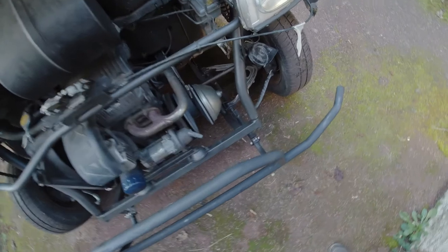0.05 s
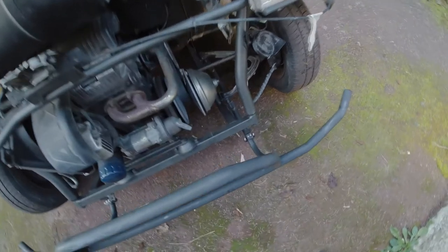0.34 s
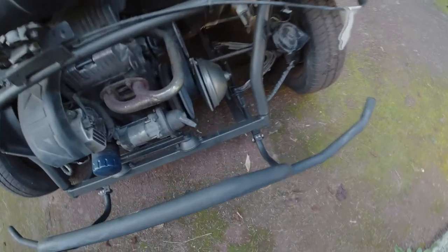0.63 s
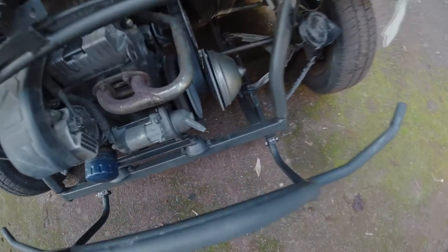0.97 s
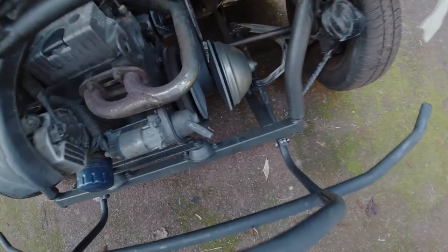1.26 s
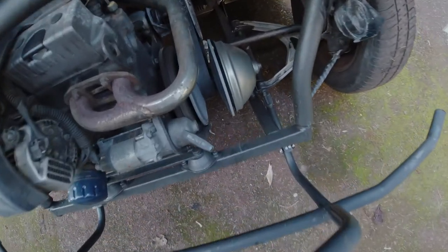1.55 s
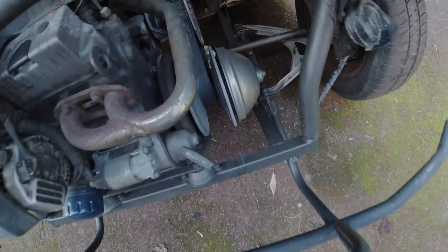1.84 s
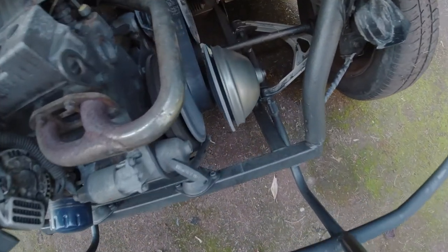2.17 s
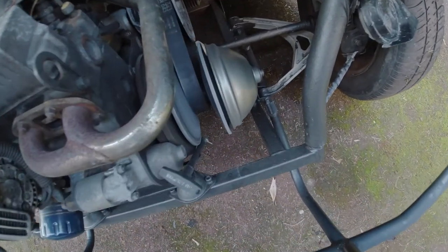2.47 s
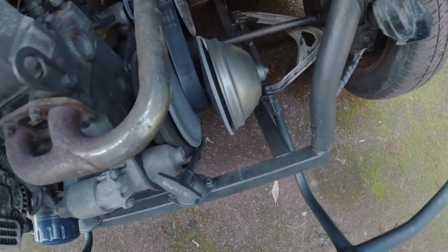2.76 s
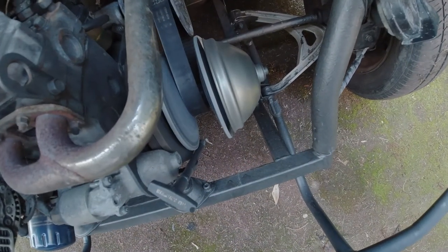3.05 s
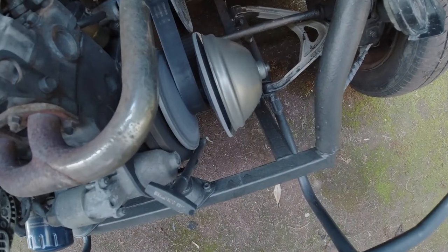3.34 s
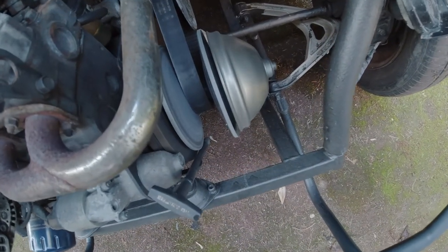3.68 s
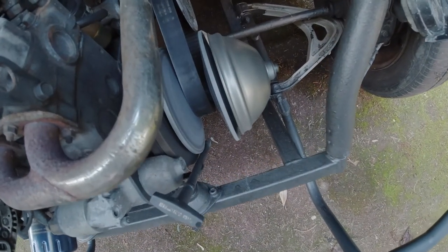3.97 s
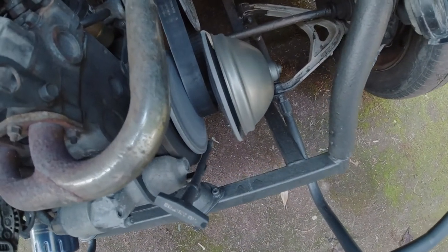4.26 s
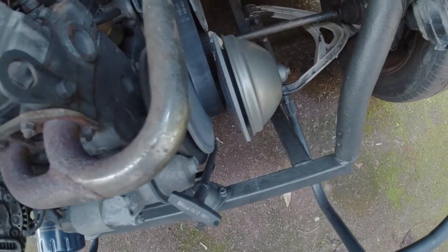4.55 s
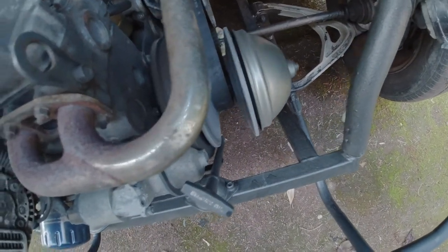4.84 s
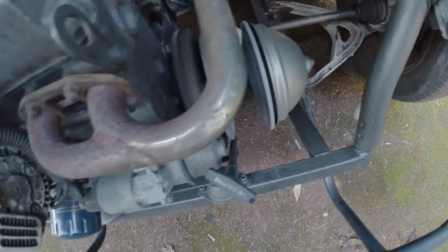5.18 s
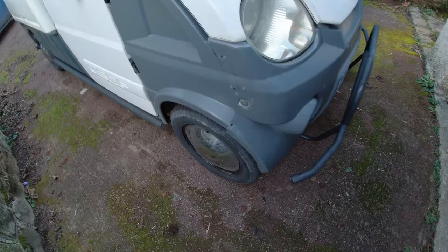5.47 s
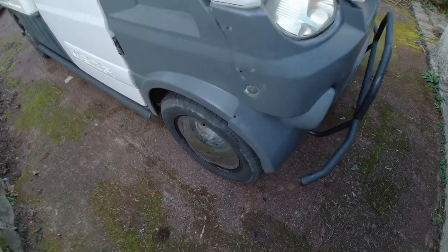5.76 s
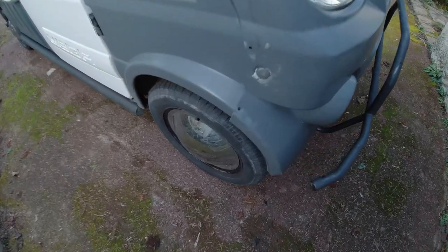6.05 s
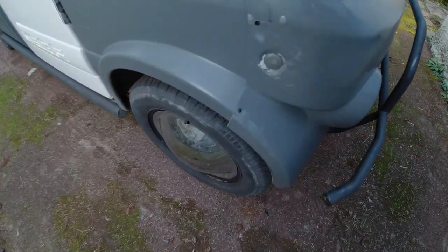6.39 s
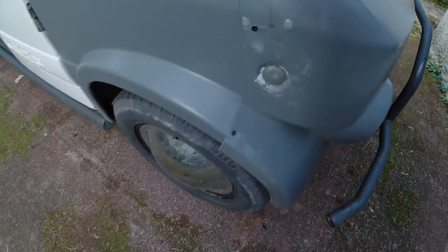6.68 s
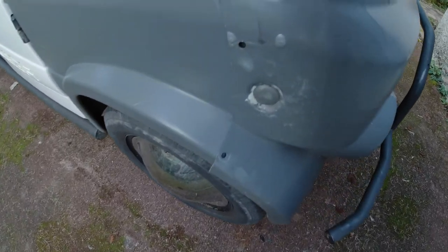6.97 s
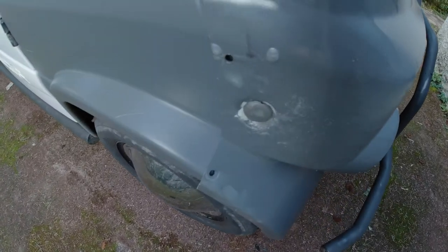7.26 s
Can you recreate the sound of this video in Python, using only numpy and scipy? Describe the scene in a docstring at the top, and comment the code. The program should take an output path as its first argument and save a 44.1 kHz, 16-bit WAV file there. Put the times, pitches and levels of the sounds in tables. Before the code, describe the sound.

Rapid knocking and ticking of a small idling diesel draws nearer and ends suddenly, followed by brief clicks over a faint hum.

```python
"""First you hear a small two-cylinder diesel idling outdoors, ever closer above its open engine bay.
Each cycle brings two combustion knocks half a turn apart, with gulps of gas and ticking valves.
Now and then a firing knocks harder and makes the crankcase, the engine's lower housing, clank.
The sound of the idling engine is cut off abruptly; a few sharp clicks and soft rustles follow,
over a faint distant hum."""
import sys
import numpy as np
from scipy import signal
from scipy.fft import rfft, irfft, next_fast_len
from scipy.io import wavfile
from scipy.ndimage import uniform_filter1d

SR = 44100
rng = np.random.default_rng(int(sys.argv[2]) if len(sys.argv) > 2 else 0)


def to_wav(sig):
    """Store sig (one row per channel, or 1-D mono) as 16-bit WAV at the path in sys.argv[1].

    Samples outside -1..1 are clipped; the rate is SR.
    """
    pcm = np.clip(np.atleast_2d(sig), -1, 1) * 32767
    pcm = np.round(pcm).astype(np.int16)
    wavfile.write(sys.argv[1], SR, pcm.T)  # frames by channels


N = 322812
TIME = np.arange(N) / SR

# Tone colours of the sounds. Each row: pitch in Hz, relative strength at that pitch in dB.
AIR_COLOUR = [(25, -2), (45, -11.5), (85, -4), (110, -5), (200, -5.5), (270, -10.5), (370, -22.5),
              (1100, -30), (2200, -37), (3400, -44), (6500, -51.5), (16000, -85)]
CLICK_COLOUR = [(150, -34), (400, -3.5), (1000, -9), (2200, 3.5), (3300, -3), (4200, -15), (6500, -21.5),
                (9000, -34), (11000, -53), (16000, -84)]
WHIRR_COLOUR = [(25, -18), (100, -0.5), (400, 8.5), (750, -0.5), (1300, -10.5), (2300, -13), (3200, -13.5),
                (4500, -23.5), (6000, -28.5), (7600, -45), (9600, -28.5), (13000, -34.5), (16000, -47)]
VALVE_COLOUR = [(200, -3), (600, 6), (1300, 1.5), (2200, -9.5), (3200, -11.5), (4500, -21), (6200, -20),
                (7600, -25.5), (9600, -16), (13000, -29.5), (16000, -27.5)]
INJECTION_COLOUR = [(400, 5.5), (2500, 1), (3700, 0.5), (4400, -1.5), (5700, -8.5), (7500, -11),
                    (9800, -6.5), (13000, -9.5), (16000, -29.5)]
FIRST_KNOCK_COLOUR = [(150, -5.5), (500, -17.5), (800, -4.5), (1300, -3), (2100, -2.5), (3100, -2.5),
                      (3700, -10), (4500, -10), (5300, -22.5), (7500, -35), (11000, -29.5), (16000, -46.5)]
SECOND_KNOCK_COLOUR = [(150, 2), (500, -30), (900, 6.5), (1600, -11.5), (2200, -10), (2900, -4),
                       (3700, -16), (6000, -34), (16000, -51.5)]
# Soft rustles. Each row: start in seconds, seconds to peak, relative level in dB.
RUSTLE_SWELLS = [(5.171, 0.047, -59.5), (5.558, .07, -47.5), (5.729, 0.011, -47), (6.805, 0.01, -66)]
# Sharp clicks after the engine sound ends. Each row: start in seconds, relative level in dB.
CLICK_HITS = [(5.5737, -22), (5.5818, -5), (5.5967, -4), (5.6032, -19), (5.6065, -13), (5.6088, -13),
              (5.6775, -30), (5.702, -35), (5.7368, -9), (5.7953, -38)]
# Drawing nearer. Each row: time in seconds, then relative dB of gas, panels, valves and knocks.
APPROACH = [(0, -8, -22, -1, -30), (0.599, -4, -5.5, 1, -28), (1.299, -2, -0.5, 3, -23.5),
            (2.502, -1.5, 0.5, 4, -20), (4, -2.5, 1, 4.5, -20.5), (5.2, -1, 2, 4.5, -23.5)]
# Suction pulses. Each row: seconds after the first knock, seconds to peak, relative level in dB.
GAS_GULPS = [(.001, 0.003, -27), (0.029, 0.0034, -16.5), (0.0406, 0.0038, -17.5), (.0620, .0014, -13.5),
             (0.0901, 0.0011, -21)]
# Ringing air in the pipes, and ringing panels.
# Each row: seconds after the first knock, pitch in Hz, seconds to peak, relative level in dB.
PIPE_TONES = [(.002, 116, 0.01, -32), (.031, 128, 0.016, -29), (.0615, 72.3, .006, -25),
              (.0622, 177.7, 0.006, -20.5), (.0628, 227, 0.0039, -16), (.0895, 84, 0.0064, -17),
              (.0905, 157.4, 0.0043, -22.5)]
PANEL_TONES = [(.016, 330, .007, -33.5), (.035, 353, 0.0074, -20.5), (.0630, 333.6, 0.0066, -18.5),
               (.0626, 283, 0.005, -16), (.0632, 602, .005, -23), (.090, 318, .006, -27.5)]
# Ringing cover and crankcase. Each row: pitch in Hz, seconds to peak, relative level in dB.
COVER_TONES = [(663.3, 0.0062, -17), (694.2, 0.0089, -19.5)]
CRANKCASE_TONES = [(1248, .005, -21.5), (1546, 0.0045, -11), (1619, 0.014, -21), (1960, .002, -11.5),
                   (2566, 0.0061, -15.5), (2860, 0.0027, -19.5)]
# How openly the cover faces the listener. Each row: time in seconds, gain in dB.
COVER_FACING = [(0, -7.5), (.5, 0), (1.5, -5.5), (2.2, -1), (2.8, 1.5), (5.2, 3.5)]
# Pitches the engine block lifts or swallows. Each row: pitch in Hz, width in Hz, gain in dB.
BLOCK_BANDS = [(490, 79, -8.5), (702, 30, 4.5), (897, 34, 6.5), (1243, 28, 2.5), (1528, 31, 4),
               (1622, 7.3, 13), (2140, 150, 4.5), (2273, 91, -3.5), (2582, 120, 8.5), (3312, 58, 9),
               (3672, 310, -5.5), (3840, 56, 6), (4020, 45, 7), (5614, 130, 7.5), (6100, 170, 7)]
# Valve and pump contacts. Each row: seconds after the first knock, length in seconds, relative dB.
VALVE_TICKS = [(0.0217, 0.033, -25.5), (0.0303, .008, -21.5), (0.048, 0.018, -25), (0.06, .010, -24),
               (0.07, .008, -31), (0.088, 0.0069, -28.5)]
# Firings that knock harder. Each row: time in seconds, dB above the usual level.
HARD_FIRINGS = [(.013, 4.5), (.489, 3), (.758, 6.5), (1.084, 8), (1.203, 4), (1.322, 6.5), (1.592, 3),
                (2.036, 2), (2.274, 3.5), (2.631, 3.5), (2.899, 5.5), (3.970, 5), (4.416, 3), (4.654, 4)]

HUM_HZ, HUM_DB = 71.3, -55
FIRST_CYCLE_S, CUT_S = 0.0132, 5.187  # the idle is heard between these times
CYCLE_S, JITTER_S = 0.118977, 0.0002  # the governor holds the idle this steady
SECOND_KNOCK_S = 0.0313  # the second cylinder fires half a turn after the first
SECOND_KNOCK_DB, SECOND_FOLLOWS = -18, 0.88  # relative level up close; share of the first knock's rise
UNEVEN_DB = 1.14  # no two firings burn alike
SHAKE_DB = -31.5  # shaking on the mounts, relative to the gas level
SNAP_FADE = 0.21  # extra dB the injection snap loses with distance, per dB the valves lose
CLANK_FULL_DB, CLANK_GROWTH = -13, 1.49  # knock level for a full clank; dB of clank per dB of knock
CLANK_SCATTER_DB, FIRST_CLANK_DB = 0.5, -11  # the first cylinder shakes the crankcase less
PORT_HZ, PORT_BLUR = 2300, 0.64  # pitch where left and right draw apart; share of scattered sound
CUTOFF_HZ = 16000


def from_db(db):
    """Turn decibels into a factor to multiply a sound by."""
    return 10 ** (np.asarray(db) / 20)


def rms_one(x):
    """Scale a signal to an average power of one."""
    return x / np.sqrt(np.mean(x ** 2) + 1e-20)


def colour(x, spectrum):
    """Give a sound a tone colour; white noise keeps its overall power."""
    size = 8192
    hz, level_db = np.transpose(spectrum)
    grid_hz = np.arange(size // 2 + 1) * SR / size
    gain = rms_one(from_db(np.interp(np.log(grid_hz + 1), np.log(hz), level_db)))
    # A minimum-phase filter: nothing rings before the blow that causes it.
    cepstrum = irfft(np.log(gain))
    cepstrum[1:size // 2] *= 2
    cepstrum[size // 2 + 1:] = 0
    response = irfft(np.exp(rfft(cepstrum)))
    return signal.fftconvolve(x, response[None], axes=-1)[:, :N]


def place(times, sounds):
    """Lay one short sound at each of the times."""
    out = np.zeros(2 * N)
    for start_s, sound in zip(times, sounds):
        at = max(round(start_s * SR), 0)
        out[at:at + len(sound)] += sound
    return out[:N]


def swell(peak_s):
    """A curve that rises to 1 at peak_s, then dies away."""
    age = TIME[:SR // 8] / peak_s
    return age * np.exp(1 - age)


def stereo(direct, scattered, toward):
    """Two close listening ports differ more at high pitch; with toward above 0 the left one leads."""
    size = next_fast_len(N)
    hz = np.arange(size // 2 + 1) * SR / size
    apart = hz / np.hypot(hz, PORT_HZ)
    difference = 1j * toward * rfft(direct, size) + PORT_BLUR * rfft(scattered, size)
    side = irfft(apart * difference, size)[:N]
    return direct + side * np.array([[1], [-1]])


def rattle(times, level_db, length_s, tail_db, tail_t60, alike, grain_db):
    """Partly alike bursts of tiny metal impacts; the tail falls 60 dB in tail_t60 seconds."""
    age = TIME[:SR // 9]
    shape = np.exp(-(age / length_s) ** 2) + from_db(tail_db - 60 * age / tail_t60)
    shape = shape * (1 - np.exp(-age / 0.001))
    pair = []
    for _ in range(2):  # the direct part, then the scattered part
        fresh = rng.standard_normal((len(times), len(age)))
        impacts = np.sqrt(alike) * rng.standard_normal(len(age)) + np.sqrt(1 - alike) * fresh
        bunching = rms_one(uniform_filter1d(rng.standard_normal(fresh.shape), size=60))
        clumps = rms_one(from_db(grain_db * np.minimum(bunching, 2)))
        pair.append(place(times, from_db(level_db)[:, None] * shape * impacts * clumps))
    return np.array(pair)


def rings(times, level_db, hz, peak_s, scatter_db=2.0, waver=0.0089):
    """A dying tone for every blow, each a little different in strength and pitch."""
    vary_db, detune = (rng.standard_normal((len(times), 2)) * [scatter_db, waver]).T
    strength = from_db(level_db + np.minimum(vary_db, scatter_db))
    shape = swell(peak_s)
    tones = -np.sin(2 * np.pi * hz * (1 + detune[:, None]) * TIME[:len(shape)])
    return place(times, strength[:, None] * shape * tones)


def outdoors():
    """Distant rumble and a low, slightly wavering hum."""
    air = from_db(-46.5) * colour(rng.standard_normal((2, N)), AIR_COLOUR)
    waver = rms_one(np.interp(TIME, np.linspace(0, TIME[-1], num=40), rng.standard_normal(40)))
    phase = 2 * np.pi * np.cumsum(HUM_HZ + 0.34 * waver) / SR
    hum = from_db(HUM_DB + 1.2 * waver) * np.sqrt(2) * np.sin(phase)
    return stereo(air[0] + hum, 2 * air[1], toward=-0.5)


def rustle():
    """A faint wash swells and fades as the engine sound ends, round the clicks and once more later."""
    level = 0
    for start_s, peak_s, level_db in RUSTLE_SWELLS:
        age = np.maximum(TIME - start_s, 0) / peak_s
        level = level + from_db(level_db) * age * np.exp(1 - age)
    direct, scattered = colour(level * rng.standard_normal((2, N)), CLICK_COLOUR)
    return stereo(direct, scattered, toward=-0.6)


def clicks():
    """Hard snaps to the right, each with a small ping, a short buzz and a faint outdoor tail."""
    times, level_db = np.transpose(CLICK_HITS)
    snaps = place(times, from_db(level_db + 9)[:, None])
    buzz = rattle(times - 0.0005, level_db - 23, length_s=0.008,
                  tail_db=-3.5, tail_t60=0.18, alike=0, grain_db=-4.0)
    direct, scattered = colour(np.array([snaps + buzz[0], buzz[1]]), CLICK_COLOUR)
    ping = rings(times, level_db - 25, hz=3450, peak_s=0.002)
    return stereo(direct + ping, scattered, toward=-0.91)


def engine_bay(x, echo_db, t60, count):
    """Dense echoes off nearby metal ripple the treble; the ripple shifts as the listener moves."""
    age = TIME[:SR // 20]
    treble = signal.butter(2, 3200, "high", fs=SR, output="sos")
    out = x
    for spot in range(count):
        echoes = rms_one(rng.standard_normal(len(age)) * from_db(-60 * age / t60)) / np.sqrt(len(age))
        reflected = signal.oaconvolve(x, signal.sosfilt(treble, echoes)[None], axes=-1)[:, :N]
        closeness = np.sqrt(np.maximum(1 - np.abs(TIME / CUT_S * (count - 1) - spot), 0))
        out = out + from_db(echo_db) * closeness * reflected
    return out


def engine_block(x):
    """The cast metal lifts and prolongs some pitches and swallows others."""
    for hz, width_hz, lift_db in BLOCK_BANDS:
        band = signal.lfilter(*signal.iirpeak(hz, hz / width_hz, fs=SR), x)
        x = x + (from_db(lift_db) - 1) * band
    return x


def throb(starts, gas_db, panel_db):
    """Gas pulses shake pipes and panels, the first knock rings the cover, and the engine rocks."""
    suction = 0
    for delay, peak_s, level_db in GAS_GULPS:
        strength = from_db(gas_db + level_db + rng.normal(0, 1.0, len(starts)))
        suction = suction - place(starts + delay, strength[:, None] * swell(peak_s))
    body = signal.sosfilt(signal.butter(1, [14, 900], "band", fs=SR, output="sos"), suction)
    for tones, near_db in ((PIPE_TONES, gas_db), (PANEL_TONES, panel_db)):
        for delay, hz, peak_s, level_db in tones:
            body += rings(starts + delay, near_db + level_db, hz, peak_s)
    facing_db = np.interp(starts, *np.transpose(COVER_FACING))
    for hz, peak_s, level_db in COVER_TONES:
        body += rings(starts + 0.0012, level_db + facing_db, hz, peak_s, waver=0.0046)
    cycle = (TIME - FIRST_CYCLE_S) / CYCLE_S
    shake = -np.cos(3 * 2 * np.pi * cycle)  # three shakes on the mounts per cycle
    body += from_db(SHAKE_DB + np.interp(TIME, starts, gas_db)) * shake
    return stereo(body, np.zeros(N), toward=0.99)


def valves(starts, valve_db):
    """Valve and pump parts tick as they meet, at the same points in every cycle."""
    ticks = 0
    for delay, length_s, level_db in VALVE_TICKS:
        tick_db = valve_db + level_db - 5.5 + rng.normal(0, 1.82, len(starts))
        ticks = ticks + rattle(starts + delay, tick_db, length_s,
                               tail_db=-13.0, tail_t60=0.24, alike=0.26, grain_db=2.5)
    return ticks


def crankcase(times, knock_db):
    """The harder the knock, the more the crankcase clanks, with a new blend of tones each time."""
    hardness_db = CLANK_GROWTH * (knock_db - CLANK_FULL_DB)
    return sum(rings(times, hardness_db + level_db, hz, peak_s, CLANK_SCATTER_DB, waver=0.004)
               for hz, peak_s, level_db in CRANKCASE_TONES)


def knock_levels(times, usual_db):
    """Each firing strays a little from the usual level in dB; the hard ones stand out."""
    level_db = usual_db + UNEVEN_DB * rng.standard_normal(len(times))
    for hard_s, extra_db in HARD_FIRINGS:
        is_hard = np.abs(times - hard_s) < CYCLE_S / 8
        level_db = np.where(is_hard, usual_db + extra_db, level_db)
    return level_db


def clatter(starts, first_db, second_db, valve_db):
    """Knocks, the injection pump's snap, valves and whirring belt and gears sound through the block."""
    first = rattle(starts - 0.001, first_db - 1.5, length_s=0.015,
                   tail_db=-4.5, tail_t60=0.066, alike=0.24, grain_db=1.0)
    second_at = starts + SECOND_KNOCK_S + rng.normal(0, 0.00031, len(starts))
    second = rattle(second_at - 0.0005, second_db - 12, length_s=0.018,
                    tail_db=-9.5, tail_t60=0.095, alike=0.067, grain_db=2.0)
    snap_db = valve_db + SNAP_FADE * (valve_db - valve_db.max()) - 21
    snap = rattle(second_at, snap_db, length_s=0.0097,
                  tail_db=-12.0, tail_t60=0.064, alike=0.49, grain_db=3.5)
    ticks = valves(starts, valve_db)
    whirr = from_db(np.interp(TIME, starts, valve_db) - 33.0) * rng.standard_normal((2, N))
    contacts = ((first, FIRST_KNOCK_COLOUR), (second, SECOND_KNOCK_COLOUR),
                (snap, INJECTION_COLOUR), (ticks, VALVE_COLOUR), (whirr, WHIRR_COLOUR))
    metal = engine_block(sum(colour(force, spectrum) for force, spectrum in contacts))
    direct, scattered = engine_bay(metal, echo_db=-4, t60=0.040, count=5)
    clank = from_db(FIRST_CLANK_DB) * crankcase(starts, first_db) + crankcase(second_at, second_db)
    return stereo(direct + clank, scattered, toward=0.83)


def engine():
    """The steady idle grows louder as the listener nears; then its sound is cut off abruptly."""
    starts = np.arange(FIRST_CYCLE_S, CUT_S, CYCLE_S)
    starts = starts + rng.normal(0, JITTER_S, len(starts))
    times, *levels = np.transpose(APPROACH)
    gas_db, panel_db, valve_db, knock_db = [np.interp(starts, times, level) for level in levels]
    first_db = knock_levels(starts, knock_db)
    second_usual_db = SECOND_KNOCK_DB + SECOND_FOLLOWS * (knock_db - knock_db.max())
    second_db = knock_levels(starts + SECOND_KNOCK_S, second_usual_db)
    audible = np.exp(-np.maximum(TIME - CUT_S, 0) / 0.0048)
    return audible * (clatter(starts, first_db, second_db, valve_db) + throb(starts, gas_db, panel_db))


def scene():
    """The engine, then clicks and rustles, over the outdoor background."""
    return engine() + clicks() + rustle() + outdoors()


def record(dry):
    """Peaks stop at full scale, and the highest treble is cut."""
    treble_cut = signal.cheby2(16, 60, CUTOFF_HZ + 700, fs=SR, output="sos")
    return signal.sosfilt(treble_cut, np.clip(dry, -1, 1))


dry = scene()
out = record(dry)
to_wav(out)
```